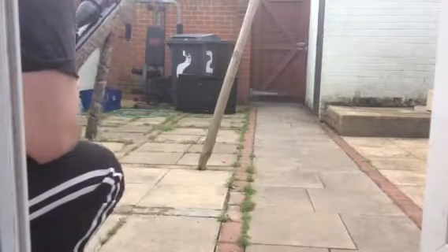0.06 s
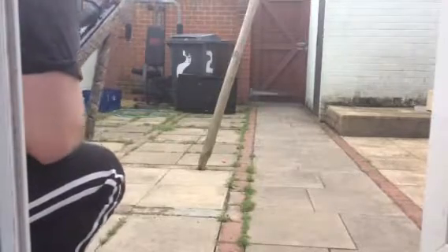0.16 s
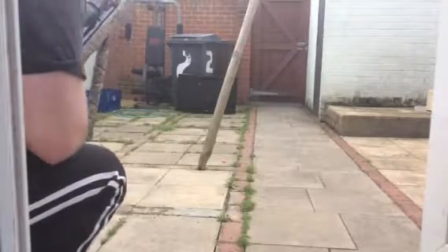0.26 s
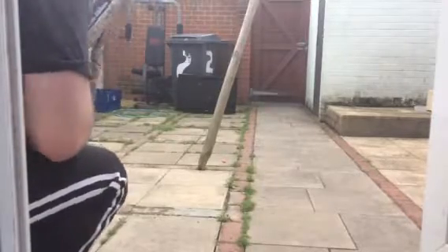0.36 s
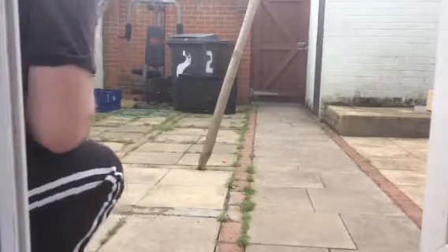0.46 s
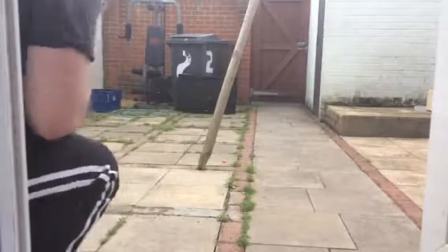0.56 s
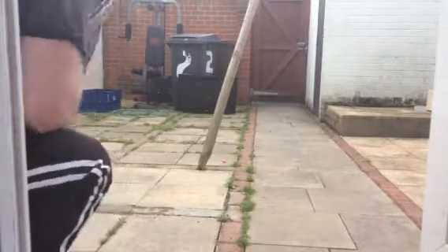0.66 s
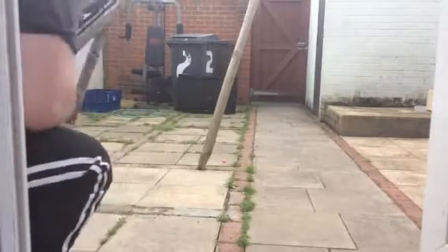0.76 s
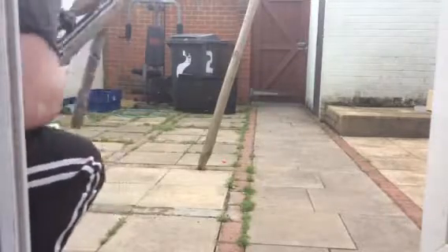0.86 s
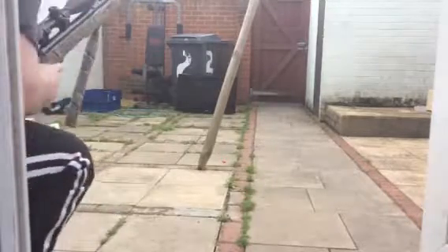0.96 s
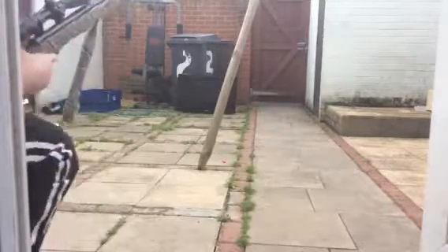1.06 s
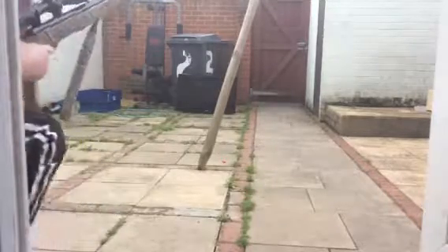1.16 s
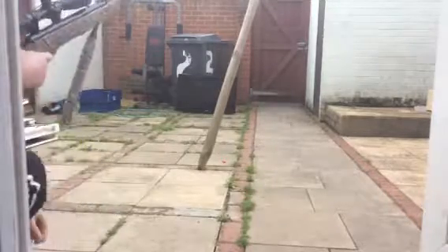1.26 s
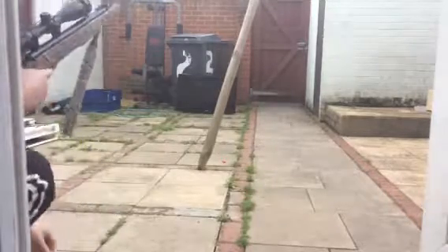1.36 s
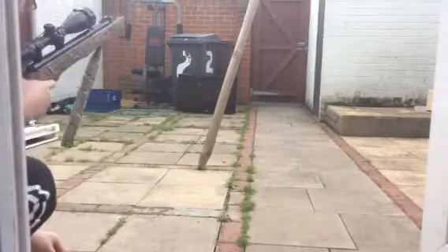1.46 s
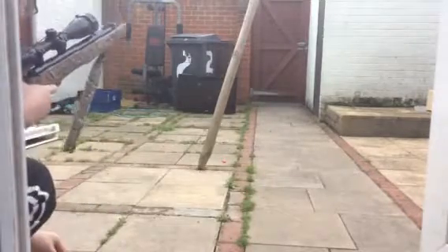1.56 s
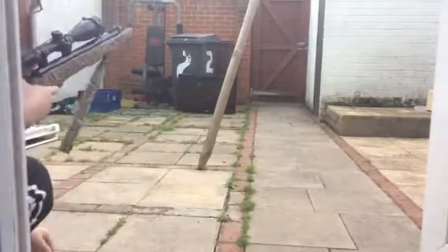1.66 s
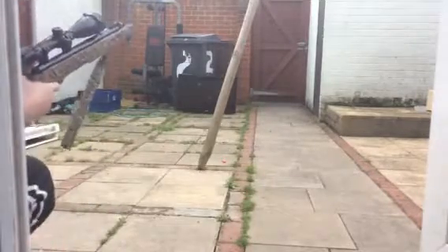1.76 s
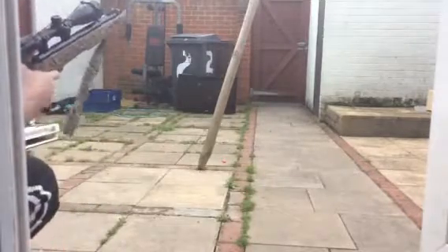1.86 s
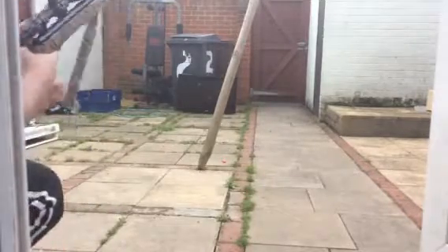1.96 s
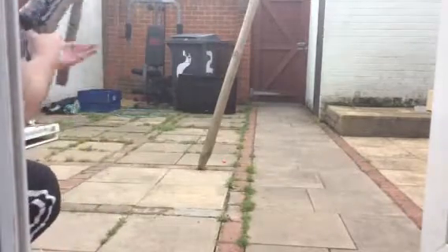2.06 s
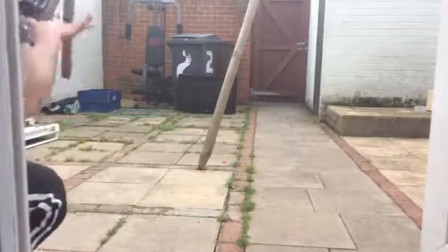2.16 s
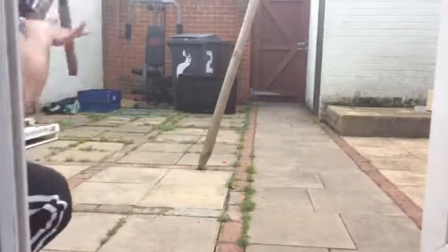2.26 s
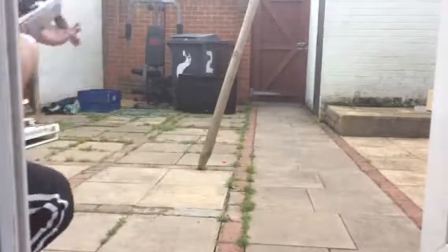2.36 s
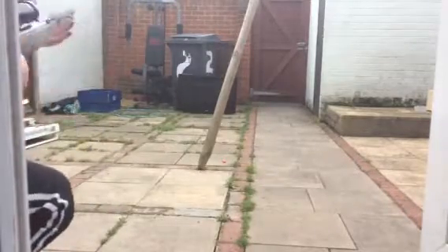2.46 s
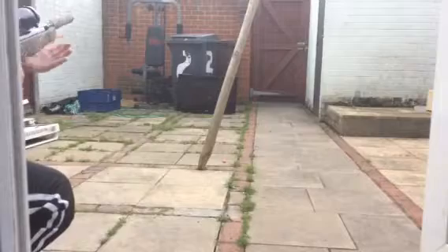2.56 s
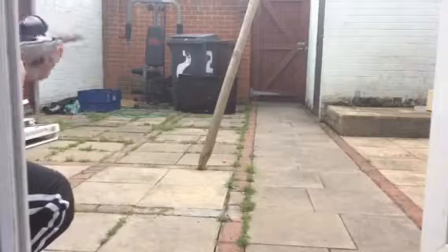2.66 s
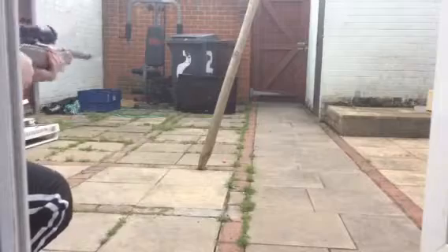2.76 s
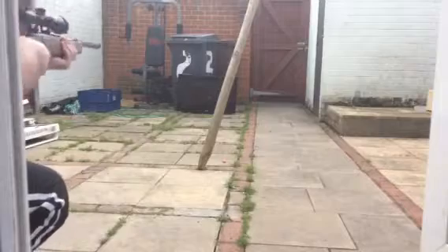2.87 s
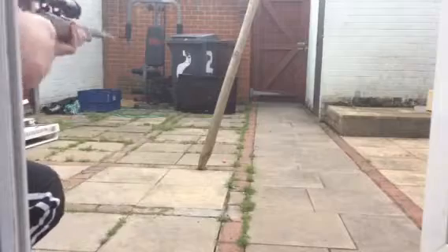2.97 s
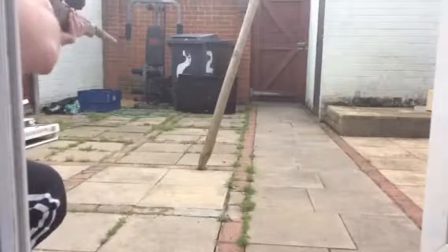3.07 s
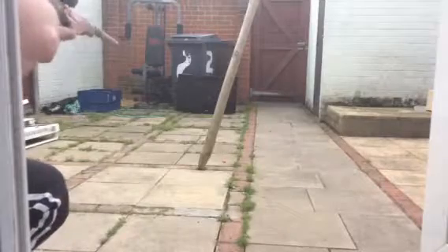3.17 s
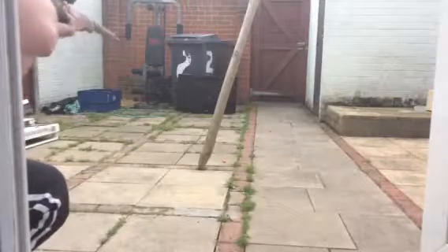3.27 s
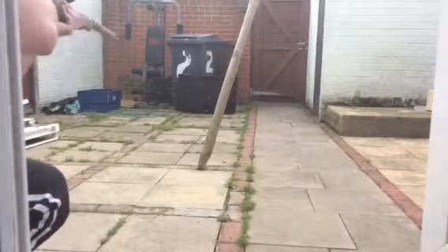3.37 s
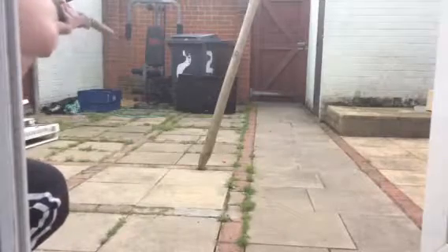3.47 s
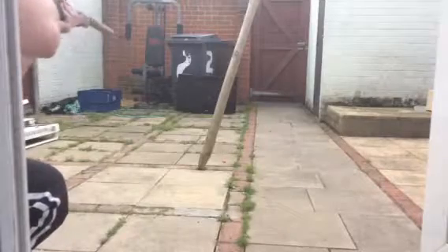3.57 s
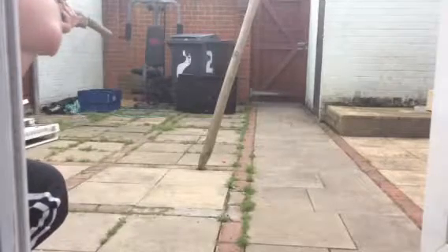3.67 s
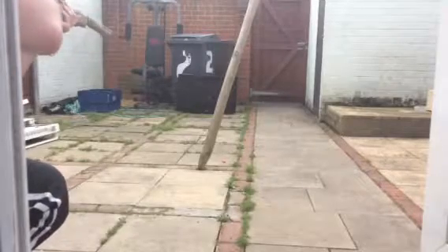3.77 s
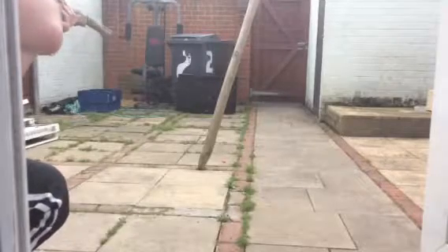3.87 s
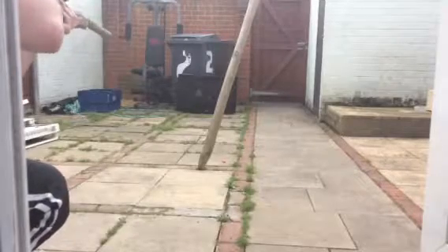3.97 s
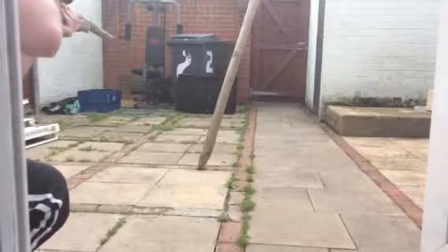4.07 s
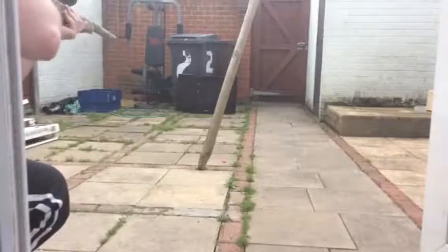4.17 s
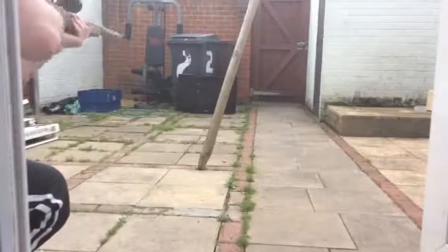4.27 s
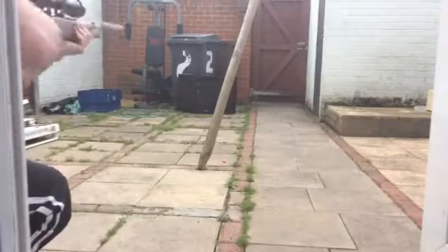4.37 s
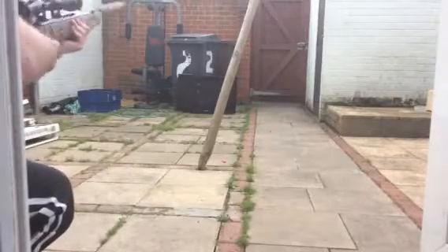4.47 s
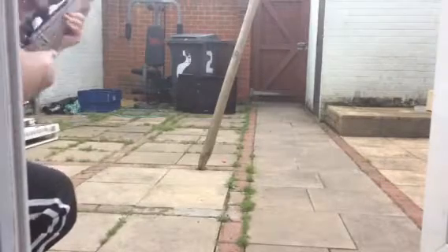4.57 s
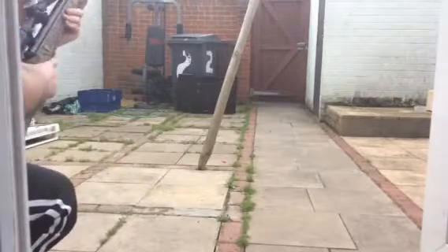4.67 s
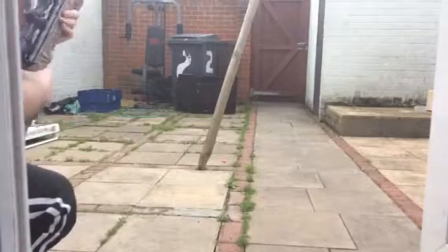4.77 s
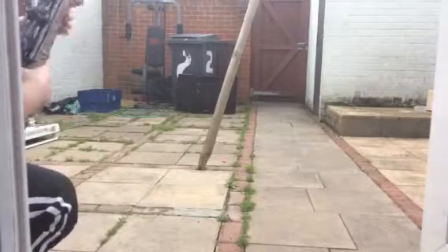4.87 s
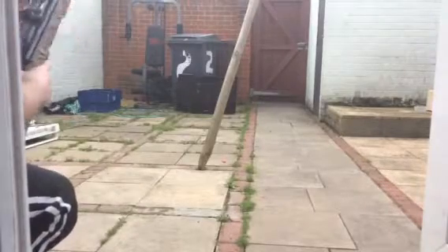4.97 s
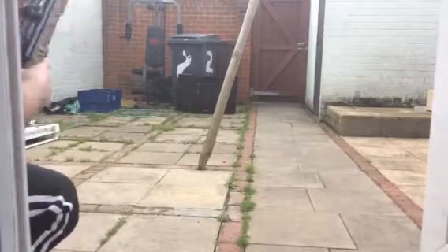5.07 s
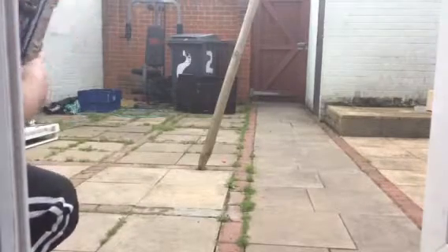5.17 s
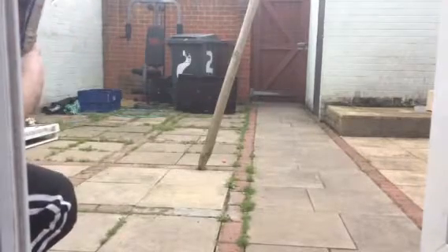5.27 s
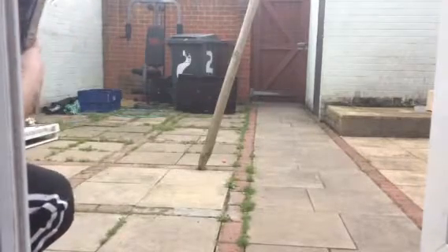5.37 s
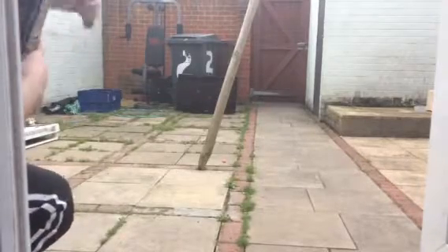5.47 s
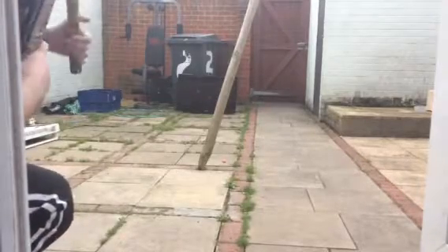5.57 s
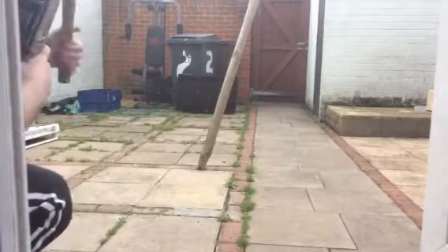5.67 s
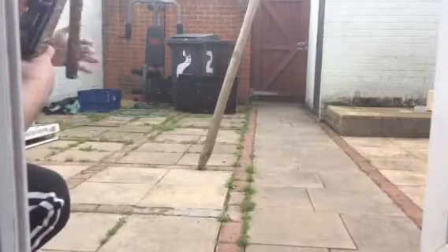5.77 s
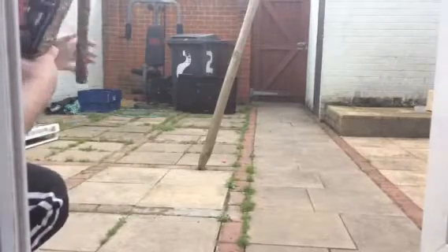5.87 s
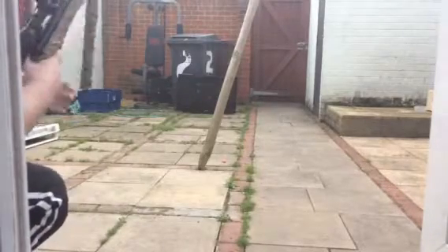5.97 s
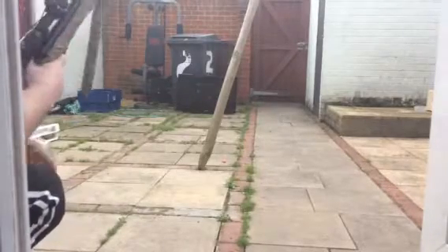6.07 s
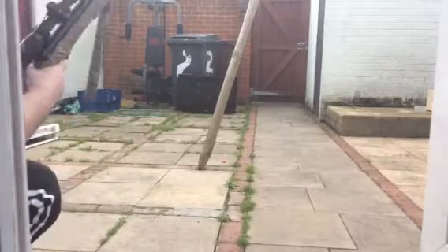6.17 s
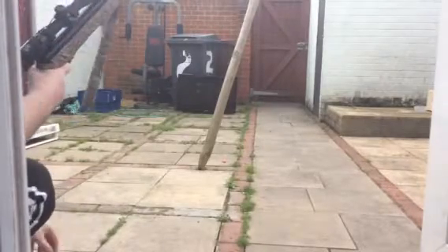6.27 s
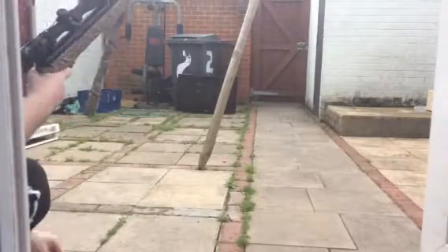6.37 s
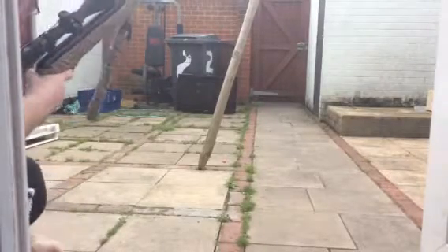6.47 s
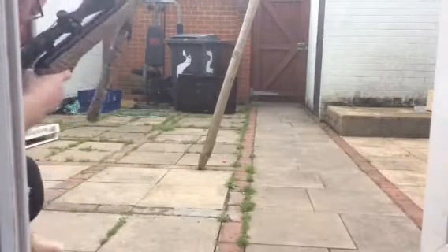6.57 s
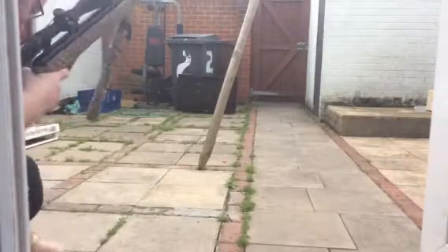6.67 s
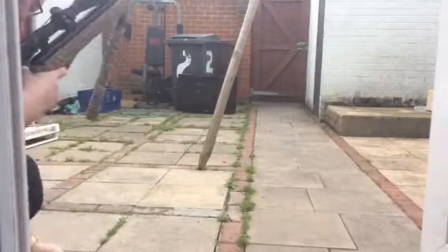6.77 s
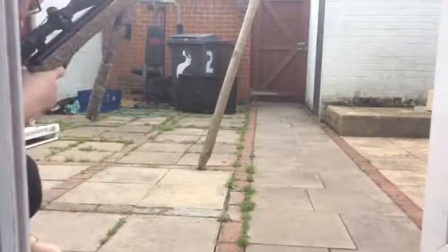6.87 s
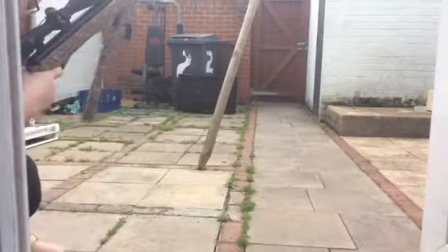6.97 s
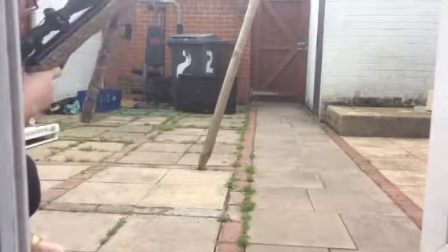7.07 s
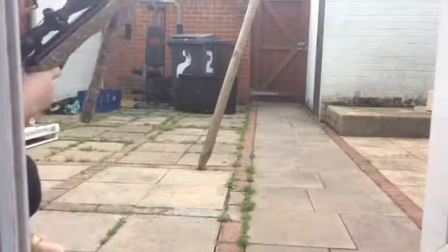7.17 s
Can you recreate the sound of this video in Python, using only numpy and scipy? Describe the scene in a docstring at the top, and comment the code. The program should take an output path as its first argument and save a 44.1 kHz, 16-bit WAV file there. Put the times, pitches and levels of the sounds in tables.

```python
"""Far traffic rumbles while a spring air rifle is loaded with soft knocks and clicks in a small walled,
paved yard; the rifle is fired once and cocked again. Every contact is a brief force that excites the
damped modes of spring, butt, stock, action and barrel, and sliding hands add friction noise.
The walls send back a flutter echo and a short tail, and the recorder's gain ducks under the shot."""
import sys
import numpy as np
from scipy import signal
from scipy.fft import rfft, irfft
from scipy.io import wavfile
from scipy.ndimage import uniform_filter1d

SR = 44100
rng = np.random.default_rng(int(sys.argv[2]) if len(sys.argv) > 2 else 0)


def pcm_store(signal):
    """Save signal as 16-bit PCM."""
    levels = np.round(np.clip(np.atleast_2d(signal), -1, 1) * 32767)
    wavfile.write(sys.argv[1], SR, levels.astype(np.int16).T)


N = 318490

# relative spectral density of the background: frequency_hz, level_db
BACKGROUND_SPECTRUM = [(15, -58), (25, -29), (55, -7), (79, -6.5), (188, -12), (253, -15.5), (313, -21),
                       (410, -19), (871, -20), (1410, -26.5), (2630, -48.5), (5430, -57.5), (9300, -53.5),
                       (13900, -67), (15500, -83)]
# road noise drawing away, and the engine hum: time_s, level_db
ROAD_LEVELS = [(0, -50.5), (1.7, -48.5), (3.9, -49.5), (5.2, -53.5), (7.22, -57)]
HUM_LEVELS = [(0.0, -47), (0.54, -53), (1.87, -48.5), (3.22, -57.5), (3.82, -54.5), (4.28, -65.5),
              (4.66, -52), (6.45, -52.5), (6.86, -56.5), (7.22, -46)]
# reverberation of the yard: frequency_hz, t60_s, level_db
YARD_DECAY = [(120, 0.31, -5), (300, 0.37, -6), (700, 0.25, -3.5), (2010, 0.29, -3.5), (3500, .3, -3),
              (6100, 0.24, -2), (9000, .25, 1), (11500, .15, -12)]
# hands and sleeves sliding on the rifle: middle_s, length_s, level_db
HAND_RUBS = [(1.283, 0.062, -77), (2.37, 0.15, -79.5), (2.494, 0.14, -66.5), (5.692, 0.037, -72),
             (6.185, 0.097, -73.5), (6.716, 0.074, -79), (6.802, 0.076, -74), (6.931, 0.093, -76.5),
             (7.126, 0.15, -72)]
# knocks and clicks of loading and cocking: time_s, wood_db, action_db, spring_db
HANDLING_CONTACTS = [(0.7018, -48.5, -55, -86), (0.8495, -36.5, -56, -79), (0.8575, -31, -44, -77),
                     (1.397, -38, -60.5, -75), (1.4254, -64, -56, -66.5), (1.698, -63, -57, -65.5),
                     (2.1148, -55, -61, -74), (2.2025, -28, -47.5, -65.5), (2.4497, -49, -49.5, -62),
                     (2.5069, -40.5, -39.5, -60.5), (2.5466, -43, -35.5, -51), (2.5604, -34.5, -43.5, -55),
                     (3.437, -53, -47.5, -60.5), (3.746, -48, -64, -77), (4.782, -53, -37, -56),
                     (5.3472, -50, -52.5, -60), (5.3766, -48, -45.5, -54), (5.41, -50, -50, -59),
                     (5.454, -43.5, -47, -59.5), (5.7077, -57, -56.5, -52.5), (5.7268, -55, -44, -41),
                     (5.77, -62, -45, -34), (5.79, -65, -56, -44.5), (5.8833, -47.5, -51.5, -68),
                     (6.774, -62, -56.5, -77), (6.8, -58, -47, -63), (6.9143, -52, -65, -70),
                     (6.978, -64, -52.5, -73.5), (7.0759, -67, -52.5, -67.5), (7.0949, -57, -55, -60.5)]
# sear release, piston rush and stop, muzzle crack, spring rattle, rebound, pellet strike, target rattle:
# time_s, wood_db, action_db, spring_db, contact_ms
SHOT_CONTACTS = [(3.976, -43.5, -46.5, -43.5, 10), (3.979, -31.5, -29.5, -32.5, 4.1),
                 (3.9846, -12.5, -31, -31, 1.83), (3.9886, -11, -18.5, -10, 0.46),
                 (3.995, -27.5, -19, -20, 6.1), (4.0053, -9, -11.5, -21, 1.1),
                 (4.0214, -15, -21.5, -30.5, 2), (4.0243, -9, -10, -17, 1.0),
                 (4.031, -13, -26, -31.5, 2.64), (4.040, -12.5, -22.5, -32.5, 3.3),
                 (4.062, -16.5, -24.5, -40, 2.83)]
# normal modes of each part: pitch_hz, level_db, t60_s
SPRING_MODES = [(6700, -3, .002), (7500, -1, .003), (8300, -1, .003), (9200, -1, .0025), (10200, -3, .002),
                (11800, -12, .002)]
BUTT_MODES = [(135, 3, 0.071), (178.5, 7, 0.08), (231.1, -1.5, 0.048)]
STOCK_MODES = [(440, -1, .028), (570, 1, .025), (750, 0, .028), (950, -4, .018), (1230, -5, .018)]
ACTION_MODES = [(1480, -1, .012), (1980, 0, .013), (2300, -4, .011), (2800, -8, .005)]
BARREL_MODES = [(3400, 0, .004), (4100, -2, .003), (4900, -2, .003), (5700, -3, .0025)]
# band radiated by each part, in the order above: low_hz, high_hz
RADIATED_BANDS = [(5660, 21000), (101, 380), (434, 1700), (1310, 6100), (2790, 6400)]

HUM_HZ, HUM_WIDTH_HZ = 75, 18
HISS_DB, CROSSOVER_HZ = -51, 1300  # the recorder's hiss takes over from the road in the treble
FLUTTER_TRIP_S, FLUTTER_TRIP_DB, WALL_HZ = 0.02, -12.5, 5000  # brick dulls the flutter above WALL_HZ
NEAREST_WALL_S, TAIL_RISE_S = 0.003, 0.0027
FAR_T60_S, FAR_DB, FAR_HZ = 0.86, -28.5, 3300  # a faint slow tail from the houses beyond
DIFFUSE_T60_SHARE = 0.33  # averaged over all directions, the modes blur and ring for less time
RUB_HZ, RIFLE_TOP_HZ = 3120, 10400
BLOW_DB, BLOW_WIDTH_MS = -4, 0.075  # the main blow of a 1 ms contact
HANDLING_MS, HANDLING_YARD_DB = 2.5, -1.5  # beside the microphone, handling is drier than the shot
DUCK_FROM_DB, DUCK_SLOPE, RECOVERY_DB_PER_S = -23.5, 0.41, 17
LOW_CUT_HZ, HIGH_CUT_HZ = 35.7, 15800


def from_db(db):
    """Amplitude ratio of a level in decibels."""
    return 10 ** (np.asarray(db) / 20)


def rms_one(x):
    """Normalisation to unit mean power."""
    return x / np.sqrt(np.mean(x ** 2) + 1e-20)


def at_hz(points, hz):
    """Interpolation on a logarithmic frequency axis."""
    frequencies, values = np.transpose(points)
    return np.interp(np.log(hz), np.log(frequencies), values)


def in_time(points):
    """Linear interpolation at every sample."""
    return np.interp(np.arange(N) / SR, *np.transpose(points))


def filtered(x, order, hz, kind="low"):
    """Butterworth filtering, flat in the passband."""
    return signal.sosfilt(signal.butter(order, hz, kind, fs=SR, output="sos"), x)


def drift(rate_hz):
    """Low-passed noise: a slow random fluctuation of unit rms."""
    step = 40
    pole = np.exp(-2 * np.pi * rate_hz * step / SR)
    slow = signal.lfilter([1], [1, -2 * pole, pole ** 2], rng.standard_normal(N // step + 2002))[2000:]
    return np.interp(np.arange(N) / step, np.arange(len(slow)), rms_one(slow))


def noise_bands(length):
    """Third-octave bands with uncorrelated neighbours, as (centre_hz, noise) pairs."""
    edges = 25 * 2 ** (np.arange(29) / 3)
    white = rng.standard_normal((2, length))
    for k, (low, high) in enumerate(zip(edges, edges[1:])):
        yield np.sqrt(low * high), filtered(white[k % 2], 2, [low, high], "band")


def background(power_share):
    """Incoherent bands add in power: power_share(hz) takes part of a wavering noise of unit rms."""
    common_drift = drift(4.5)
    whole, part = 0, 0
    for hz, noise in noise_bands(N):
        band = noise * from_db(at_hz(BACKGROUND_SPECTRUM, hz) + .5 * common_drift + .6 * drift(9))
        whole += band
        part += band * np.sqrt(power_share(hz))
    return part / np.sqrt(np.mean(whole ** 2))


def traffic():
    """Broadband road noise and an engine hum, which wavers as narrow-band noise does."""
    road = background(lambda hz: 1 / (1 + (hz / CROSSOVER_HZ) ** 4))
    radius = np.exp(-np.pi * HUM_WIDTH_HZ / SR)
    resonance = [1, -2 * radius * np.cos(2 * np.pi * HUM_HZ / SR), radius ** 2]
    hum = rng.standard_normal(N)
    for _ in range(2):
        hum = signal.lfilter([1, 0, -1], resonance, hum)
    return from_db(in_time(ROAD_LEVELS)) * road + from_db(in_time(HUM_LEVELS)) * rms_one(hum)


def yard(sound):
    """Reverberation: dense reflections decay exponentially, and facing walls add a flutter echo."""
    t, decay = np.arange(SR) / SR, np.array(YARD_DECAY)
    response = np.zeros(SR)
    for hz, noise in noise_bands(SR):
        near = noise, at_hz(decay[:, [0, 1]], hz), at_hz(decay[:, [0, 2]], hz)
        far = noise[::-1], FAR_T60_S, FAR_DB - 6 * np.log2(hz / FAR_HZ) ** 2
        for carrier, t60_s, level_db in (near, far):
            unit_energy_gain = np.sqrt(6 * np.log(10) / t60_s / SR)
            response += carrier * from_db(level_db - 60 * t / t60_s) * unit_energy_gain
    response *= 1 - np.exp(-t / TAIL_RISE_S)
    flutter = np.zeros(SR)
    for trip in range(1, 4):
        flutter[round(trip * FLUTTER_TRIP_S * SR)] = from_db(trip * FLUTTER_TRIP_DB)
    response += filtered(flutter, 1, WALL_HZ)
    return signal.fftconvolve(sound, response)[:N]


def rubs():
    """Sliding friction: noise two octaves wide swells and fades with each movement."""
    t = np.arange(N) / SR
    noise = filtered(rng.standard_normal(N), 1, [RUB_HZ / 2, RUB_HZ * 2], "band")
    envelope = sum(from_db(db) * np.exp(-(2 * (t - middle_s) / length_s) ** 2)
                   for middle_s, length_s, db in HAND_RUBS)
    return envelope * rms_one(filtered(noise, 4, RIFLE_TOP_HZ))


def ring(force, hz, t60_s):
    """A damped oscillator answers each impulse with a decaying sine."""
    radius, angle = from_db(-60 / (t60_s * SR)), 2 * np.pi * hz / SR
    return signal.lfilter([0, np.sin(angle)], [1, -2 * radius * np.cos(angle), radius ** 2], force)


def contact_force(t, contact_ms):
    """Impact: one blow, weaker in a longer contact, at the crest of a burst of micro-clicks."""
    contact_s = contact_ms / 1000
    blow = from_db(BLOW_DB) / contact_ms * np.exp(-((t - contact_s) * 1000 / BLOW_WIDTH_MS) ** 2)
    clicks = rng.standard_normal(len(t)) * t / contact_s * np.exp(-t / contact_s)
    return clicks - blow


def direct_ring(force, modes, steel):
    """Modal superposition: wooden modes start in phase, steel modes alternate in sign."""
    signs = (-1 if steel else 1) ** np.arange(len(modes))
    strengths = signs * from_db(2.5 * rng.standard_normal(len(modes)))
    return sum(gain * from_db(db) * ring(force, hz, t60) for gain, (hz, db, t60) in zip(strengths, modes))


def diffuse_ring(t, modes, delay_s):
    """Averaged over all directions, modes add in power; their spectrum gives one delayed pulse."""
    impulse = 1. * (t == 0)
    power = sum(abs(from_db(db) * rfft(ring(impulse, hz, t60 * DIFFUSE_T60_SHARE))) ** 2
                for hz, db, t60 in modes)
    pulse = np.roll(irfft(np.sqrt(power)), round(delay_s * SR))
    return pulse * (t < t.mean())


def rifle(contacts, butt_offset_db):
    """Forced vibration: each contact rings all five parts. Returns the direct and the diffuse sound."""
    t = np.arange(8192) / SR
    sound = np.zeros((2, N + len(t)))
    parts = SPRING_MODES, BUTT_MODES, STOCK_MODES, ACTION_MODES, BARREL_MODES
    for time_s, wood_db, action_db, spring_db, contact_ms in contacts:
        force, contact_s = contact_force(t, contact_ms), contact_ms / 1000
        start = round((time_s - contact_s) * SR)  # the blow falls at time_s
        barrel_db = (action_db + spring_db) / 2 - 3
        levels_db = spring_db, wood_db + butt_offset_db, wood_db, action_db, barrel_db
        for modes, band_hz, level_db in zip(parts, RADIATED_BANDS, levels_db):
            direct = direct_ring(force, modes, steel=band_hz[0] > 1000)
            diffuse = diffuse_ring(t, modes, contact_s + NEAREST_WALL_S)
            direct, diffuse = filtered([direct, diffuse], 3, band_hz, "band")
            diffuse *= np.linalg.norm(direct) / np.linalg.norm(diffuse)  # equal energy
            amplitude = np.sqrt(2 * uniform_filter1d(direct ** 2, size=177).max())  # loudest 4 ms
            sound[:, start:start + len(t)] += from_db(level_db) / amplitude * np.array([direct, diffuse])
    return filtered(sound[:, :N], 3, RIFLE_TOP_HZ)


def scene():
    """Superposition of the rifle's direct sound, its reflections, the rubbing and the traffic."""
    handling = [(*row, HANDLING_MS) for row in HANDLING_CONTACTS]
    handled, handled_diffuse = rifle(handling, butt_offset_db=-6)
    fired, fired_diffuse = rifle(SHOT_CONTACTS, butt_offset_db=-18)
    echoes = yard(fired_diffuse + from_db(HANDLING_YARD_DB) * handled_diffuse)
    return (handled + fired + echoes + rubs() + traffic())[None]


def record(dry):
    """Automatic gain control ducks and steadily recovers; hiss, saturation and band limits follow."""
    level_db = 10 * np.log10(uniform_filter1d(dry ** 2, size=441, axis=1).clip(1e-12))
    duck_db = DUCK_SLOPE * np.maximum(level_db - DUCK_FROM_DB, 0)
    recovery_db = RECOVERY_DB_PER_S * np.arange(N) / SR
    held_db = np.maximum.accumulate(duck_db + recovery_db, axis=1) - recovery_db
    smooth_db = signal.lfilter([.004], [1, -.996], held_db)
    ducked = filtered(dry * from_db(-smooth_db), 2, LOW_CUT_HZ, "high")
    hiss = from_db(HISS_DB) * background(lambda hz: 1 / (1 + (CROSSOVER_HZ / hz) ** 4))
    rounded = np.tanh(ducked + hiss)
    return signal.sosfilt(signal.cheby2(12, 70, HIGH_CUT_HZ, fs=SR, output="sos"), rounded)


dry = scene()
out = record(dry)
pcm_store(out)
```